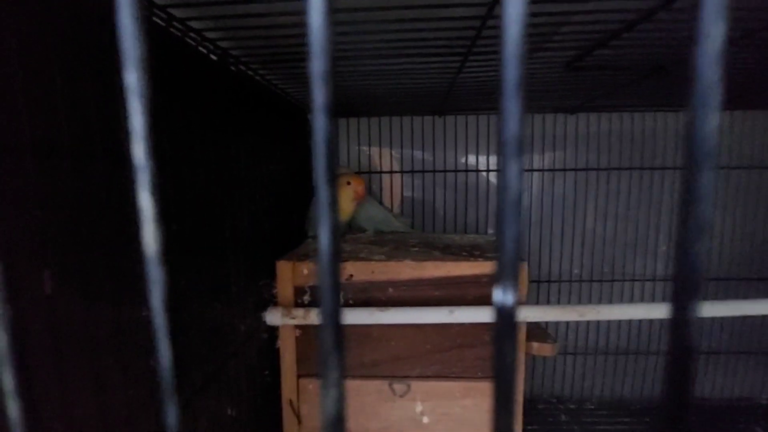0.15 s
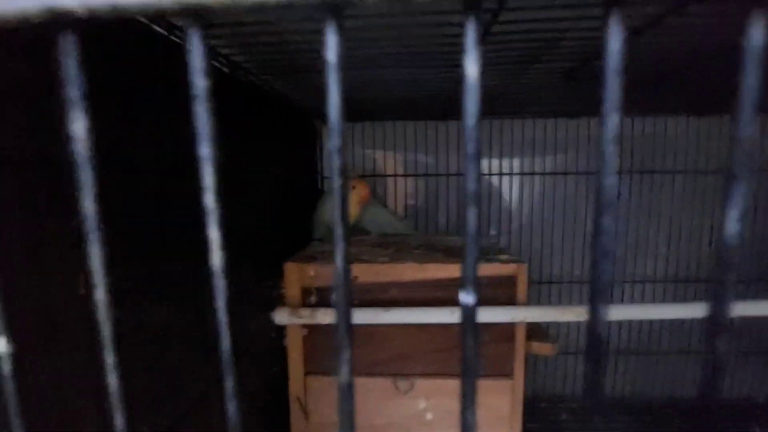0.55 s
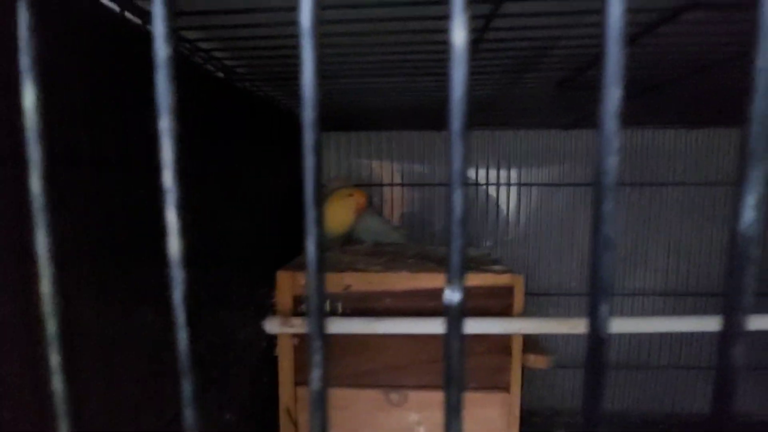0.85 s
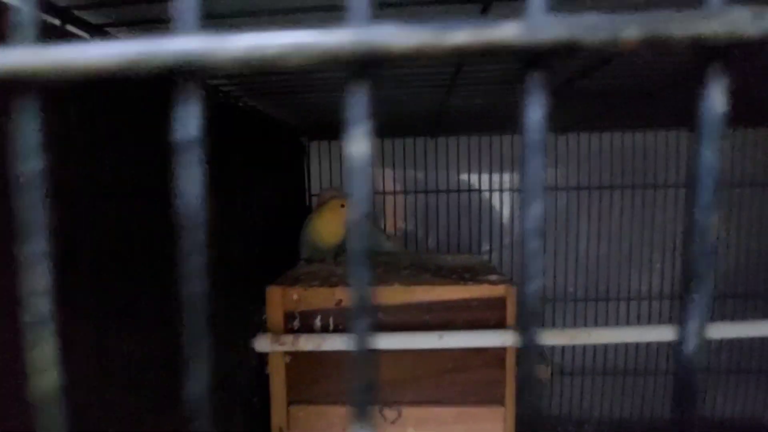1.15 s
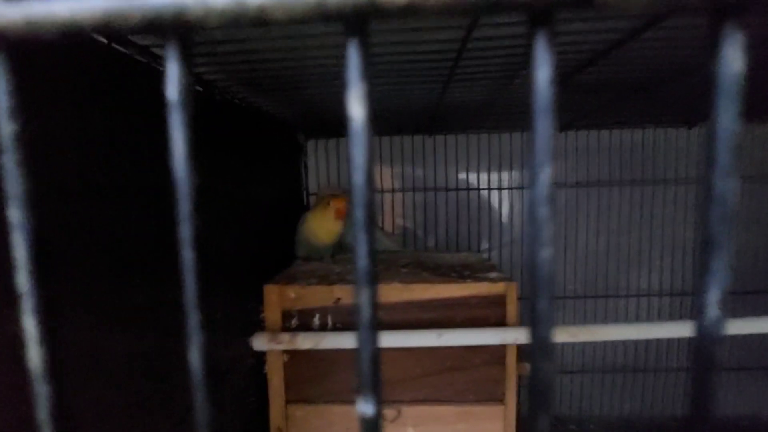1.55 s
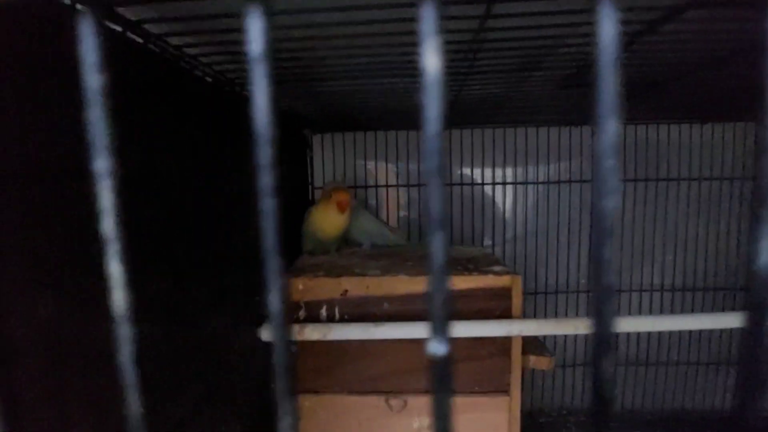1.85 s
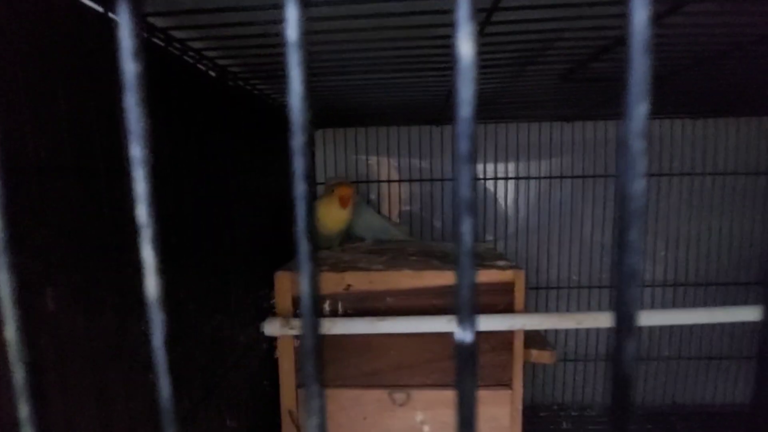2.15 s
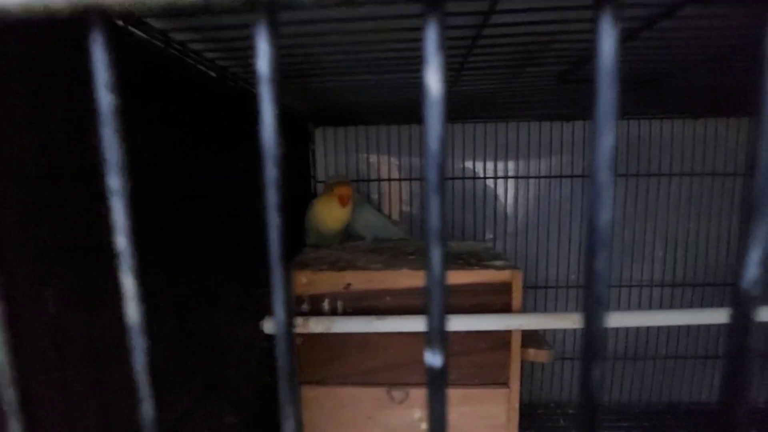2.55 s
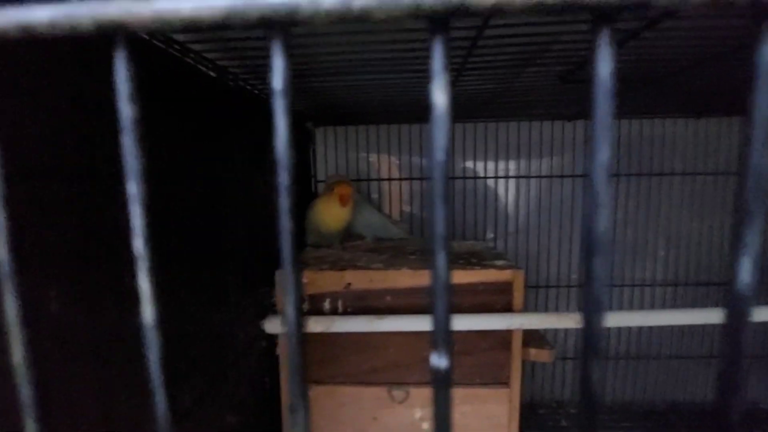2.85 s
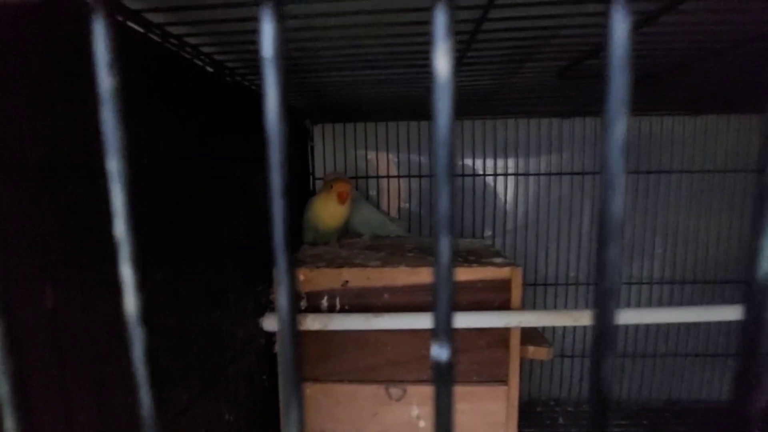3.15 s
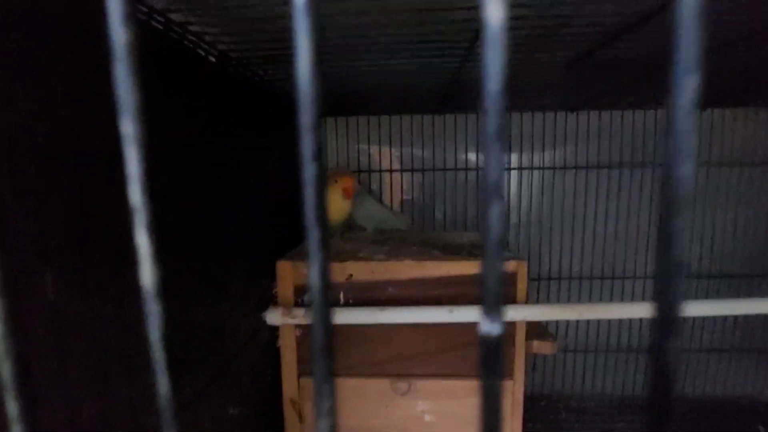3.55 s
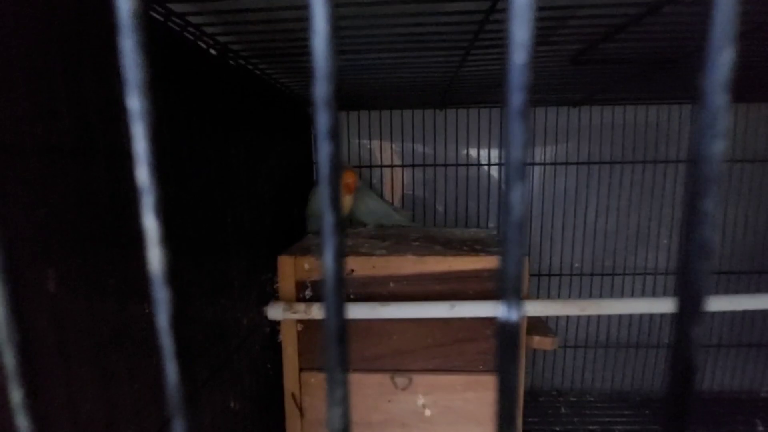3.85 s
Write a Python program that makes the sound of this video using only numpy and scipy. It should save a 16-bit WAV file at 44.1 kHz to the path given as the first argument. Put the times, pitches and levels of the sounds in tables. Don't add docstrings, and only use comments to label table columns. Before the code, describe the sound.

One sharp parrot squawk late on, after a faint squeak, scuffing feet and a passing engine hum.

```python
import sys
import numpy as np
from scipy import signal
from scipy.fft import rfft, irfft
from scipy.io import wavfile

SR = 44100
rng = np.random.default_rng(int(sys.argv[2]) if len(sys.argv) > 2 else 0)


def master(y):
    cut = np.clip(np.atleast_2d(y).T, -1, 1)
    pcm = np.round(cut * 32767)
    wavfile.write(sys.argv[1], SR, pcm.astype(np.int16))


def voltage_ratio(level):
    return 10 ** (np.asarray(level, float) / 20)


N = 176400


def seconds():
    return np.arange(N) / SR


def evened(x):
    return x / np.sqrt(np.mean(x ** 2) + 1e-20)


def read(points, hz):
    f, value = np.transpose(points)
    return np.interp(np.log(hz + 1), np.log(f + 1), value)


def humps(rows, hz):
    powers = [voltage_ratio(db) ** 2 / (1 + (2 * (hz - f) / width) ** 2) ** 2 for f, width, db in rows]
    return np.sqrt(sum(powers))


def drift(hz):
    size = round(4 * hz * N / SR) + 8
    steps = np.convolve(rng.standard_normal(size + 4), np.hanning(5), "same")[2:-2]
    return evened(np.interp(np.linspace(0, size - 1, N), np.arange(size), steps))


def left_right(db):
    return voltage_ratio(np.array([[db], [-db]]) / 2)


def noise_in_band(rows):
    hz = np.fft.rfftfreq(N, 1 / SR)
    return evened(irfft(rfft(rng.standard_normal(N)) * humps(rows, hz), N))


# (f/Hz, likeness 0-1)
LIKENESS = [(60, 0.83), (240, 0.74), (950, 0), (3770, 0.0), (15000, 0)]
# (f/Hz, left over right level/dB)
LEFT_LEAN = [(60, -4.5), (180, 3.5), (550, 3), (1650, -2), (4970, 1), (15000, -7)]


def coloured(gain):
    hz = np.fft.rfftfreq(N, 1 / SR)
    a, b = rfft(rng.standard_normal((2, N)))
    same = np.clip(read(LIKENESS, hz), -1, 1)
    lean = voltage_ratio(read(LEFT_LEAN, hz) / 2)
    left = a * lean
    right = (same * a + np.sqrt(1 - same ** 2) * b) / lean
    return evened(irfft(np.array([left, right]) * gain(hz), N))


# (f/Hz, time to fall 60 dB t/s)
WALLS = [(500, 0.4), (2000, 0.31), (6000, 0.3), (15000, 0.26)]


def room(x, pan_db, direct_db):
    hz, t, z = signal.stft(rng.standard_normal((2, SR // 2)), SR, nperseg=128)
    decay = voltage_ratio(-60 * t / read(WALLS, hz)[:, None])
    tail = signal.istft(z * decay, SR, nperseg=128)[1]
    tail = tail * np.minimum(np.arange(tail.shape[1]) / (0.0058 * SR), 1)
    tail = tail / np.linalg.norm(tail[0])
    scatter = 90
    tail[:, :scatter] += voltage_ratio(direct_db) * rng.standard_normal((2, scatter)) / np.sqrt(scatter)
    wet = signal.fftconvolve(x * np.ones((2, 1)), tail, axes=1)[:, :N]
    return wet * left_right(pan_db)


# (f/Hz, width f/Hz, level/dB)
THROAT = [(2300, 1800, 3), (4400, 430, -17), (5220, 2600, -2), (8080, 1220, 1.5), (12030, 2000, 1)]


def bird(rows, warble, jitter, gaps, hiss, top_hz):
    t = seconds()
    s, hz, db, tilt_db, rough = np.transpose(rows)
    hz, tilt_db = np.interp(t, s, hz), np.interp(t, s, tilt_db)
    rough = np.clip(np.interp(t, s, rough), 0, 1)

    turns = 2 * np.pi * np.cumsum(hz * (1 + jitter * drift(500))) / SR
    turns = turns + warble * np.sin(2 * np.pi * 500 * t)
    tone, power = 0, 0
    for k in range(1, 12):
        gain = voltage_ratio(tilt_db * (k - 1)) * humps(THROAT, hz * k) * (hz * k < top_hz)
        tone = tone + gain * np.cos(k * turns)
        power = power + gain ** 2 / 2
    tone = tone / np.sqrt(power)

    rasp = noise_in_band(THROAT[:1]) + hiss * voltage_ratio(np.minimum(tilt_db, 0)) * noise_in_band(THROAT[1:])

    throb_hz, throb_depth, flutter_db = 125, 0.35, 2.5
    throb = 1 + throb_depth * np.cos(2 * np.pi * np.cumsum(throb_hz * (1 + 0.18 * drift(30))) / SR)
    loudness = voltage_ratio(np.interp(t, s, db, -200, -200) + flutter_db * drift(200))
    call = loudness * throb * ((1 - rough) * tone + rough * rasp)

    f = np.fft.rfftfreq(N, 1 / SR)
    path = (0.14 + 1 / (1 + (f / top_hz) ** 60)) * (f > 600)
    for middle, width, depth in gaps:
        path = path * (1 - min(depth, 1) / (1 + (2 * (f - middle) / width) ** 6))
    return irfft(rfft(call) * path, N)


# (t/s, pitch f/Hz, level/dB, brightness level/dB per overtone, roughness 0-1)
SQUAWK = [
    (3.33, 1700, -68.5, -8, 0.3),
    (3.352, 1800, -35, -20, 0.08),
    (3.39, 2055, -23, -12.5, 0.21),
    (3.399, 2460, -23.5, -1, 0.17),
    (3.412, 2827, -28, 0, 0.12),
    (3.440, 3005, -26.5, -1, 0.25),
    (3.446, 4063, -24.5, -4.5, 0.16),
    (3.468, 4320, -32, 0.5, 0.24),
    (3.485, 4400, -35.5, -28.5, 0.48),
]
# (f/Hz, width f/Hz, depth 0-1)
SQUAWK_GAPS = [(1190, 1390, 0.91), (3420, 760, 0.5), (6400, 300, 0.93), (10160, 500, 0.7)]


def squawk():
    return room(bird(SQUAWK, 0.4, 0.019, SQUAWK_GAPS, hiss=3.5, top_hz=13900), -3.5, -1.1)


# (t/s, pitch f/Hz, level/dB, brightness level/dB per overtone, roughness 0-1)
SQUEAK = [
    (.414, 2680, -57, -15, 0),
    (.424, 2497, -40.5, -13, 0.54),
    (.434, 2243, -35, -11.5, 0.54),
    (.440, 1558, -42, -1, 0.23),
    (.458, 1514, -37, 1, 0.25),
    (.466, 1474, -35, -4, 0.3),
    (.485, 1405, -41.5, -4.5, 0.2),
    (.518, 1400, -47.5, -7, 0.12),
    (.532, 1390, -76, -6.5, 0.1),
]
# (middle f/Hz, width f/Hz, depth 0-1)
SQUEAK_GAPS = [(900, 700, .9), (3570, 950, 1), (5150, 260, 1), (6500, 350, 1)]


def squeak():
    return room(bird(SQUEAK, 0.16, 0.010, SQUEAK_GAPS, hiss=1.18, top_hz=15300), -3.5, -2.1)


# (start t/s, length t/s, level/dB, brightness 0-1, left over right level/dB)
SCUFFS = [(0, 0.031, -49.5, 0, -2.5), (0.05, 0.065, -50, 0.45, -2), (0.118, 0.07, -52, 0.6, -2),
          (0.177, 0.22, -60, 0.4, -1.5), (0.283, 0.05, -56.5, 0.7, -3), (0.31, 0.23, -54.5, 0.1, -3),
          (0.603, 0.15, -73.5, 0.08, -12), (0.935, 0.066, -57, 0.87, 1), (0.995, 0.27, -72, 0.4, -1),
          (1.151, 0.11, -62.5, 0.55, -11.5), (1.178, 0.15, -49, 0.02, -5), (1.263, 0.22, -69.5, 0.05, -8.5),
          (1.431, 0.042, -78, 0.1, -7), (2.25, 0.042, -60.5, 0.57, -1), (2.26, 0.095, -59, 0.19, -2.5),
          (3.78, 0.17, -72, 0, -3)]
# (f/Hz, level/dB per Hz)
DULL = [(180, -31), (300, 6.5), (492, -10.5), (708, -3.5), (1180, -17), (2040, -6), (2560, -13.5),
        (7880, -32), (15500, -44.5)]
# (f/Hz, level/dB per Hz)
BRIGHT = [(350, -37.5), (600, -20.5), (979, -2.5), (1530, -11), (2570, -9), (3920, -16.5), (6580, -15),
          (13500, -19), (15500, -24.5)]
# (f/Hz, width f/Hz, level/dB)
PORTS = [(7800, 760, -2.5), (11900, 1100, 4)]


def rustle(colour):
    grit_db = 1.5
    noise = coloured(lambda hz: voltage_ratio(read(colour, hz)) * (1 + humps(PORTS, hz)) * (hz > 250))
    return evened(noise * voltage_ratio(grit_db * drift(900)))


def scuffs():
    t, out = seconds(), np.zeros((2, N))
    dull, bright = rustle(DULL), rustle(BRIGHT)
    for s, length, db, share, pan_db in SCUFFS:
        done = np.clip((t - s) / length, 0, 1)
        share = np.clip(share, 0, 1)
        swell = np.sin(np.pi * done ** 0.8) ** 2
        grit = np.sqrt(1 - share) * dull + np.sqrt(share) * bright
        out += voltage_ratio(db) * left_right(pan_db) * swell * grit
    return room(out, 0, 1.0)


# (middle t/s, level/dB, pitch f/Hz)
THUMPS = [
    (0.362, -49.5, 597),
    (0.449, -38, 195),
    (.68, -59, 630),
    (1.189, -50, 405),
    (1.2, -43, 103.9),
    (2.292, -52.5, 275),
    (3.5, -52, 296),
]


def thumps():
    t, noise, out = seconds(), rng.standard_normal(N), 0
    for s, db, hz in THUMPS:
        band = signal.butter(2, [0.62 * hz, 1.166 * hz], "band", fs=SR, output="sos")
        puff = np.exp(-((t - s) / 0.024) ** 2)
        out = out + voltage_ratio(db) * puff * evened(signal.sosfilt(band, noise))
    return out


# (f/Hz, width f/Hz, level/dB)
SHED = [(63.1, 6.4, -3.5), (86.8, 21, -6), (116.3, 15.8, 2), (148, 40, -21), (224, 66, -17),
        (297.8, 38.2, -10.5), (424, 204, -24.5)]
# (f/Hz, level/dB)
ROAR = [(200, 8), (500, -10.5), (1000, -25.5), (3000, -35)]


def engine(rows, orders_db):
    waver_db, roar_db = 2, -7.5
    t = seconds()
    s, hz, db, lift_db = np.transpose(rows)
    hz = np.interp(t, s, hz)
    turns = 2 * np.pi * np.cumsum(hz) / SR
    orders = 0
    for k in range(2, 14):
        level = orders_db[min(k - 2, len(orders_db) - 1)] + waver_db * np.sqrt(k / 2) * drift(4)
        if k == 4:
            level = level + np.interp(t, s, lift_db)
        swell = np.repeat(humps(SHED, k * hz[::50]), repeats=50)
        orders = orders + swell * voltage_ratio(level) * np.cos(k * turns + 2 * np.pi * rng.random())
    roar = coloured(lambda f: humps(SHED, f) + voltage_ratio(read(ROAR, f) - 20.5))
    fade = np.clip(np.minimum(t - s[0] + 0.14, s[-1] - t + 0.23) / 0.13, 0, 1)
    return fade * voltage_ratio(np.interp(t, s, db)) * (evened(orders) * left_right(-1.2) + voltage_ratio(roar_db) * roar)


# (t/s, firing rate f/Hz, level/dB, lift of the fourth order level/dB)
LEAVING = [(0, 34.29, -34.5, -1.5), (.15, 33.58, -33.5, 0), (.28, 32.74, -34, -3.5),
           (.43, 31.32, -35, -5.5), (.55, 30.19, -38, 3.5), (.64, 29.51, -39, -1), (.77, 28.91, -38.5, 1.5),
           (.92, 28.09, -39, 1.5), (1.04, 27.52, -46, -3), (1.2, 26.78, -41, 6.5),
           (1.35, 25.58, -48.5, 2.5), (1.6, 23.29, -50, 4.5), (1.92, 21.03, -51, 3),
           (2.2, 20.43, -54, -2.5), (2.6, 20.61, -53.5, -2.5)]
LEAVING_ORDERS = [0, 1.5, 0, -3.5, -7.5]


def leaving_engine():
    return engine(LEAVING, LEAVING_ORDERS)


# (t/s, firing rate f/Hz, level/dB, lift of the fourth order level/dB)
COMING = [
    (2.8, 24.33, -65.5, 2),
    (3.1, 25.93, -46.5, 4),
    (3.24, 27.91, -43, 3),
    (3.34, 29.36, -42, -1.5),
    (3.45, 30.26, -37.5, 1.5),
    (3.6, 32.25, -38, -4.5),
    (3.72, 34.58, -38, 4),
    (3.85, 35.8, -39, 7),
    (4.0, 36.94, -37.5, 7),
]
COMING_ORDERS = [-14.5, -2.5, 0, 0, -3]


def coming_engine():
    return engine(COMING, COMING_ORDERS)


# (f/Hz, level/dB, time to fall 60 dB t/s)
TAP = [(288, -14.5, 0.026), (405, -20, 0.039), (1400, -29.5, 0.0086), (2700, -9.5, 0.0039),
       (5460, -28.5, 0.0045), (8100, -15, 0.002), (12000, -39, 0.0022)]
# (f/Hz, level/dB, time to fall 60 dB t/s)
RECOIL = (134, -14.5, 0.041)


def tap():
    tap_s, rise_s, right_db, room_db = 2.6574, 0.00039, -28.5, -62
    t = np.maximum(seconds() - tap_s, 0)
    body = 0
    for hz, db, t60 in TAP:
        body = body + voltage_ratio(db - 60 * t / t60) * np.cos(2 * np.pi * hz * (t - rise_s))
    body = body * np.minimum(t / rise_s, 1) ** 2
    hz, db, t60 = RECOIL
    body = body - voltage_ratio(db - 60 * t / t60) * np.sin(2 * np.pi * hz * t)
    puff = signal.lfilter([0.2], [1, -0.8], rng.standard_normal(N)) * (t > 0) * voltage_ratio(room_db - 60 * t / 0.05)
    return body * voltage_ratio(np.array([[0], [right_db]])) + room(puff * 10, 0.82, -7.0)


# (start t/s, length t/s,
# pitch f/Hz, width f/Hz, level/dB)
CHIRPS = [(.16, 0.19, 4580, 250, -70), (0.238, 0.053, 2550, 200, -62), (0.129, 0.046, 12100, 1500, -61),
          (0.337, .09, 11350, 700, -63.5), (.34, 0.044, 6870, 301, -63), (.36, .07, 2630, 200, -62.5),
          (0.656, 0.32, 1922, 600, -76), (0.993, 0.18, 2700, 600, -74), (1.422, 0.09, 9476, 4980, -75.5),
          (1.35, 1.19, 2000, 910, -86), (2.245, 0.13, 1100, 900, -68), (1.19, .34, 2000, 250, -68),
          (.05, .05, 1900, 500, -56), (.12, .05, 3800, 900, -62), (0.593, 0.0999, 8000, 1500, -73.5),
          (2.872, .07, 7940, 1500, -84.5), (3.326, .06, 7940, 600, -65), (3.349, 0.098, 15220, 152, -54),
          (3.354, .08, 14500, 303.5, -63.5), (3.78, .1, 9000, 2500, -76.5),
          (3.807, 0.14, 2085, 1080, -69.5)]


def chirps():
    t, f = seconds(), np.fft.rfftfreq(N, 1 / SR)
    noise, out = rfft(rng.standard_normal(N)), 0
    for s, length, hz, width, db in CHIRPS:
        swell = np.sin(np.pi * np.clip((t - s) / length, 0, 1) ** 0.73) ** 2
        band = evened(irfft(noise * humps([(hz, width, 0)], f), N))
        out = out + voltage_ratio(db) * swell * band
    return room(out, -3.5, 1.6)


# (t/s, level/dB)
INSECT = [
    (1.2, -83),
    (1.5, -84),
    (1.8, -95),
    (2.85, -84.5),
    (2.998, -95),
    (4, -76),
]


def insects():
    band = coloured(lambda hz: humps([(7150, 690, 0)], hz))
    return band * voltage_ratio(np.interp(seconds(), *np.transpose(INSECT)))


# (f/Hz, level/dB per Hz)
BACKGROUND = [(15, -27.5), (25, -25.5), (55, -6.5), (113, -1.5), (188, -14), (314, -18), (523, -33),
              (3830, -52), (15500, -50.5)]


def background():
    return voltage_ratio(-55 + 0.5 * drift(0.77)) * coloured(lambda hz: voltage_ratio(read(BACKGROUND, hz)))


def scene():
    birds = squawk() + squeak()
    feet = scuffs() + thumps()
    road = leaving_engine() + coming_engine()
    return birds + feet + road + tap() + chirps() + insects() + background()


# (start t/s, end t/s, low f/Hz, high f/Hz)
HOLES = [
    (.47, .61, 3200, 3950),
    (.5, .59, 6300, 6600),
    (.45, .54, 5000, 5200),
    (3.45, 3.62, 13950, 16000),
    (3.47, 3.495, 9700, 10300),
    (3.54, 3.57, 10300, 11000),
]


def dropped(x):
    hz, t, z = signal.stft(x, SR, nperseg=512)
    for start, end, low, high in HOLES:
        inside = ((hz > low) & (hz < high))[:, None] * ((t > start) & (t < end))
        z = z * (1 - 0.97 * inside)
    return signal.istft(z, SR, nperseg=512)[1][:, :N]


def top_cut(x):
    return signal.sosfilt(signal.butter(12, 15690, fs=SR, output="sos"), x)


def record(dry):
    low_cut = signal.butter(3, 48, "high", fs=SR, output="sos")
    cut = signal.sosfilt(low_cut, dropped(dry))
    left_over = np.arange(N)[::-1] / (0.007 * SR)
    fade = np.sin(np.pi / 2 * np.minimum(left_over, 1)) ** 2
    return top_cut(cut * fade)


dry = scene()
out = record(dry)
master(out)
```